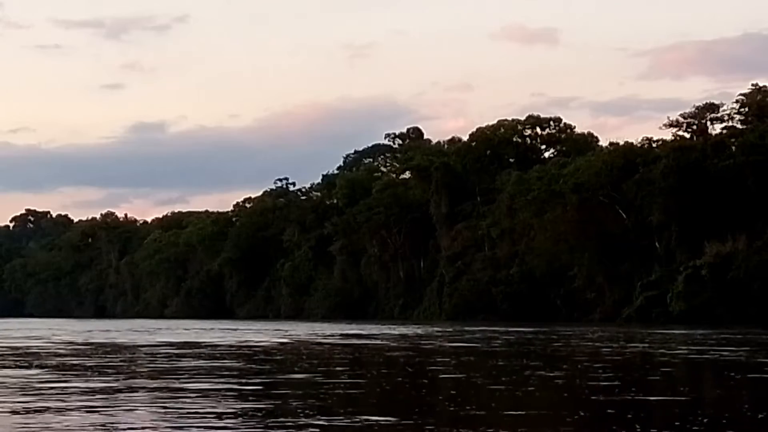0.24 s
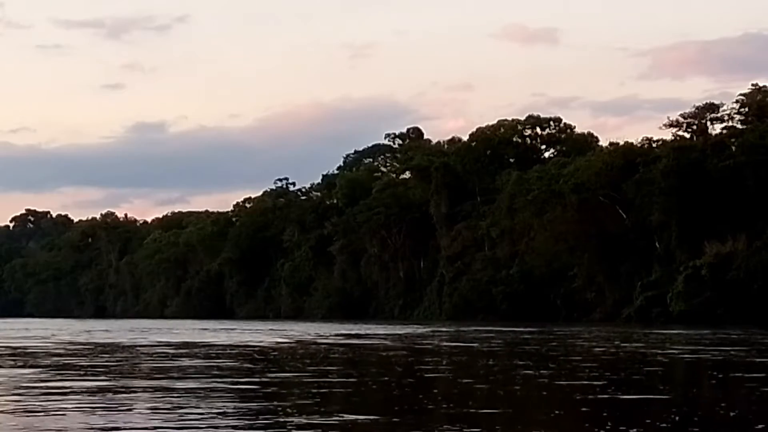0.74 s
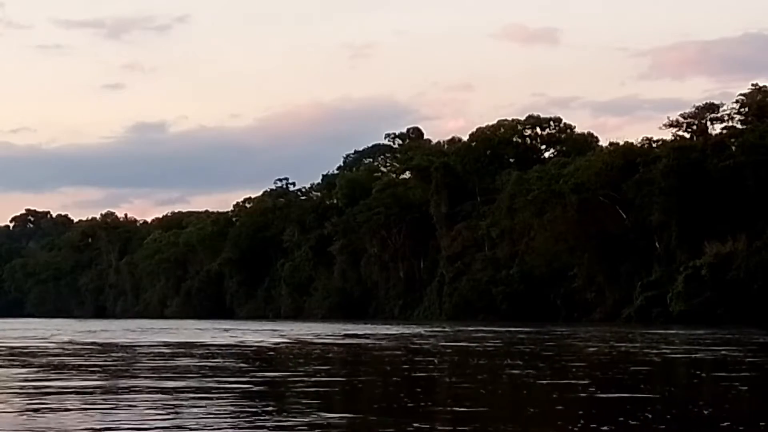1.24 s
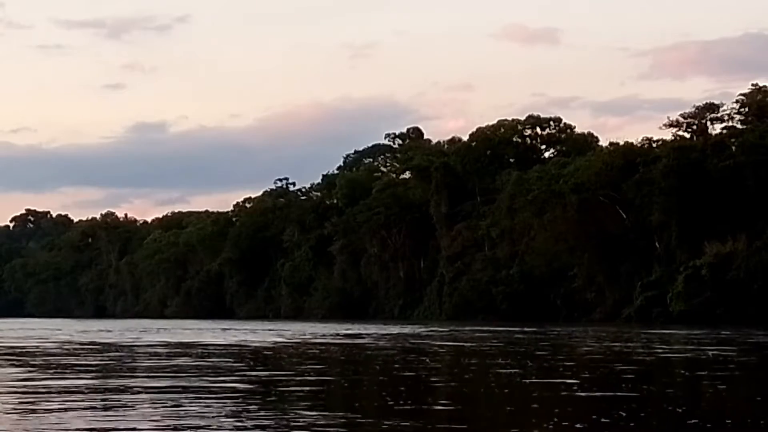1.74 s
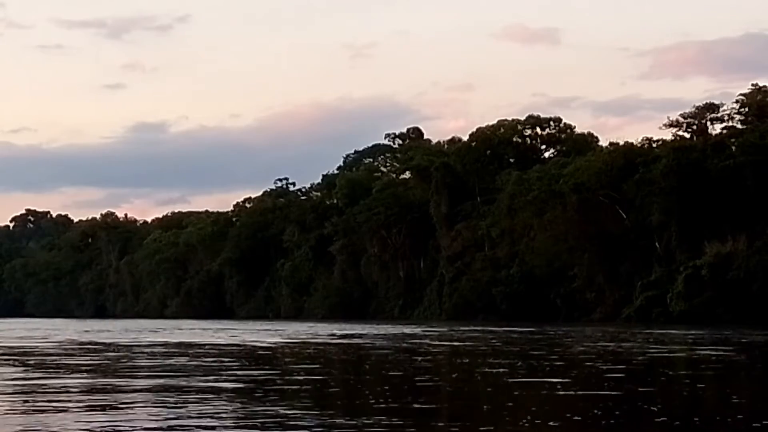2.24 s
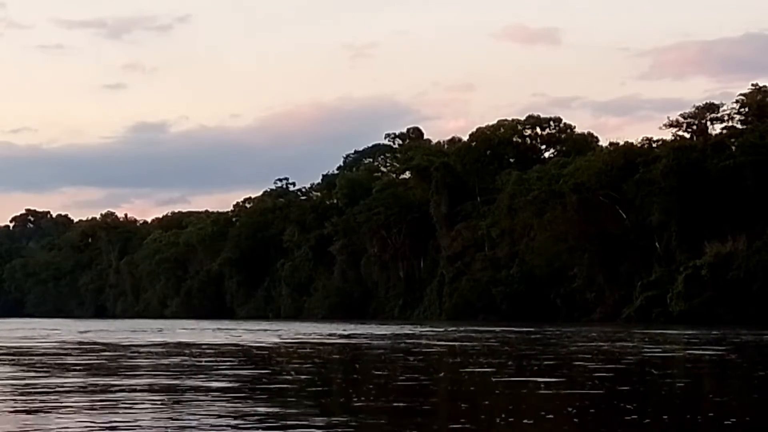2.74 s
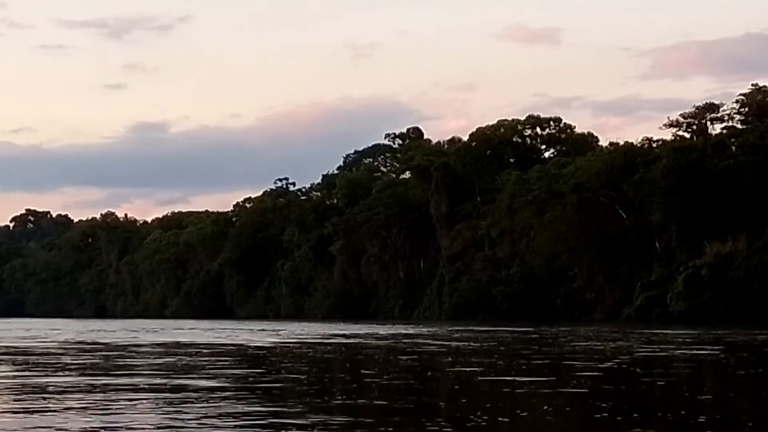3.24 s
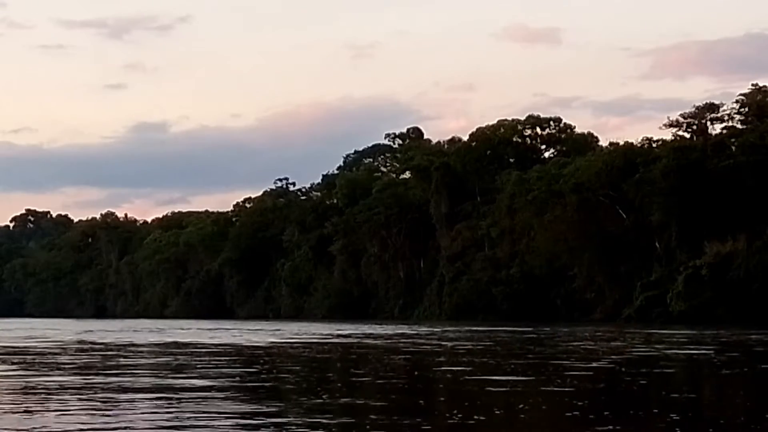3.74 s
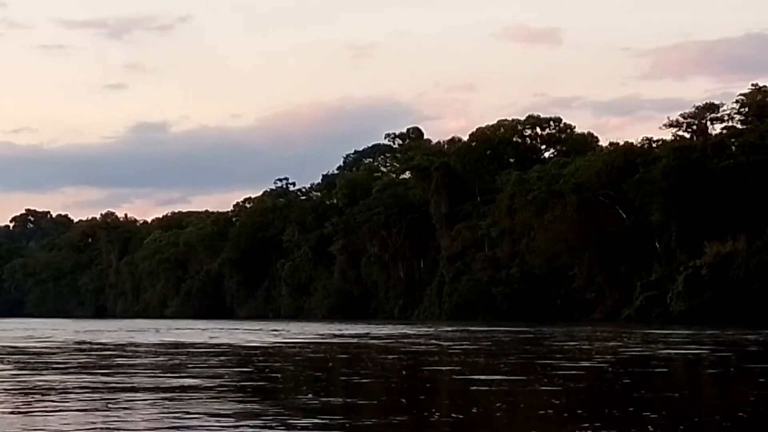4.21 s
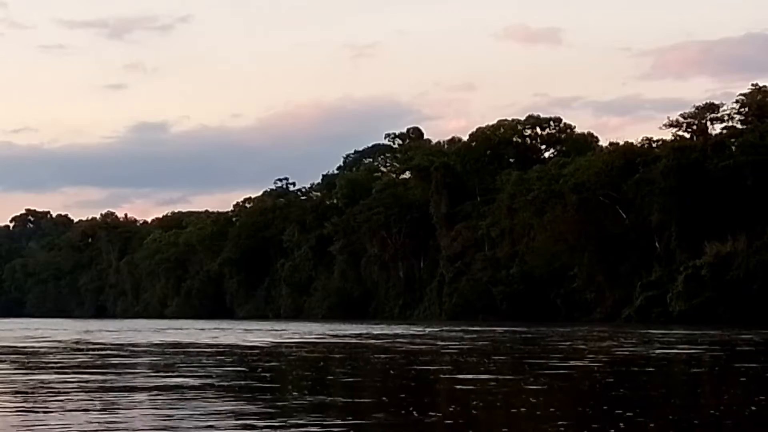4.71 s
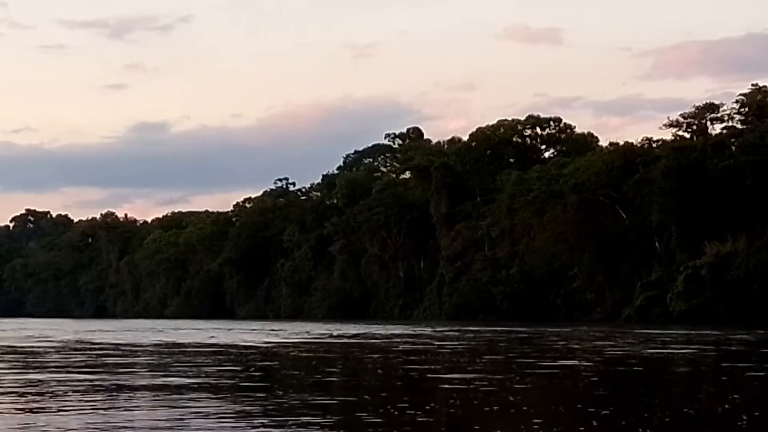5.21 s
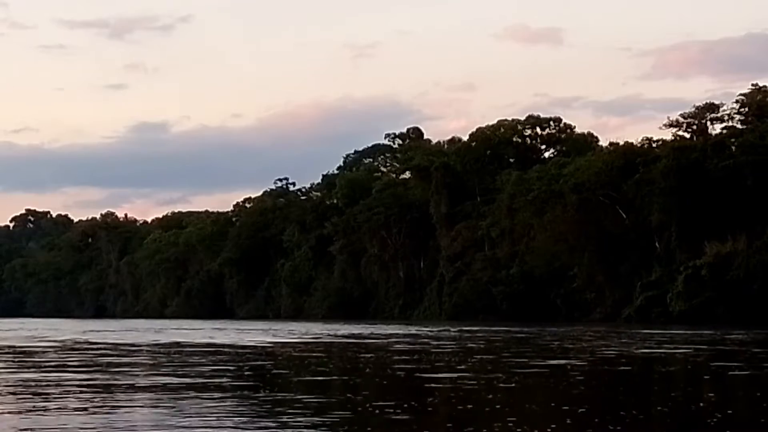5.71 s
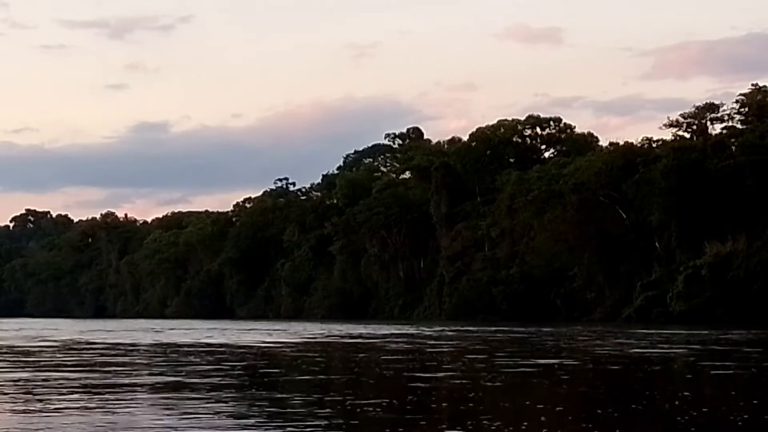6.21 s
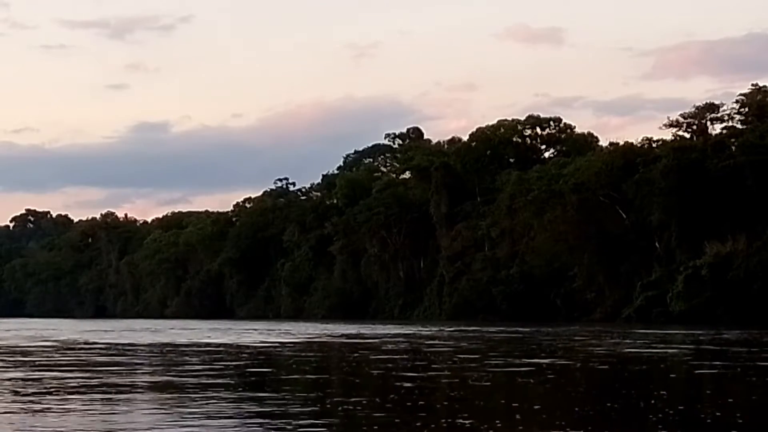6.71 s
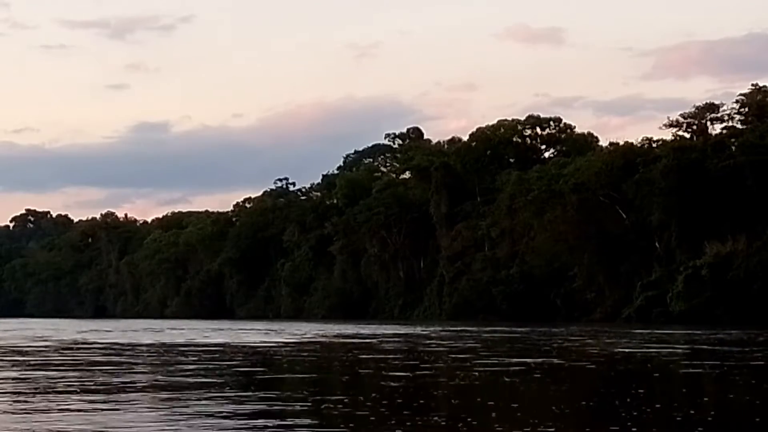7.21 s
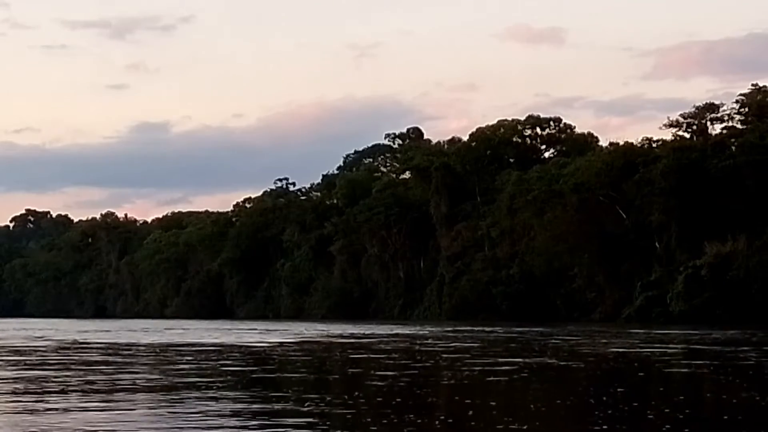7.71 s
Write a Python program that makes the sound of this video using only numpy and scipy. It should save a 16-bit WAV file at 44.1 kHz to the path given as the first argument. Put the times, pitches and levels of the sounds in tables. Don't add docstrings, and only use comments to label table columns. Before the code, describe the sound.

A dense, shrill cicada chorus pulses over a dusk river with cricket whistles, then one near cicada swells to a buzz and throbs rhythmically.

```python
import sys
import numpy as np
from scipy import signal
from scipy.fft import next_fast_len
from scipy.io import wavfile
from scipy.ndimage import uniform_filter1d

SR = 44100
rng = np.random.default_rng(int(sys.argv[2]) if len(sys.argv) > 2 else 0)


def volts_from_db(level):
    exponent = np.asarray(level, float) / 20
    return 10 ** exponent


def transcribe(signal):
    frames = np.atleast_2d(signal).T
    limited = np.clip(frames, -1, 1)
    pcm = np.round(limited * 32767).astype(np.int16)
    wavfile.write(sys.argv[1], SR, pcm)


N = 350595
TIME = np.arange(N) / SR
TAKEOVER_S = 4.52


def rms_one(x):
    return x / np.sqrt(np.mean(x ** 2) + 1e-20)


def in_time(rows):
    s, *columns = np.transpose(rows)
    return [np.interp(TIME, s, c) for c in columns]


def at_hz(points, hz):
    table_hz, value = np.transpose(points)
    return np.interp(np.log(hz), np.log(table_hz), value)


def drift(rate_hz):
    r = np.exp(-80 * np.pi * rate_hz / SR)
    white = rng.standard_normal(N // 40 + 2002)
    slow = signal.lfilter([1], [1, -2 * r, r * r], white)[2000:]
    return np.interp(np.arange(N) / 40, np.arange(len(slow)), rms_one(slow))


def resonate(x, hz, width_hz):
    r = np.exp(-np.pi * width_hz / SR)
    pole = [1, -2 * r * np.cos(2 * np.pi * hz / SR), r * r]
    once = signal.lfilter([1, 0, -1], pole, x)
    return rms_one(signal.lfilter([1], pole, once))


def steadied(x, share):
    power = uniform_filter1d(x ** 2, SR // 40)
    return rms_one(x / (power + 0.019) ** (share / 2))


def window(start_s, end_s, rise_s, fall_s, time=TIME):
    opening = 1 + np.tanh((time - start_s) / rise_s)
    closing = 1 + np.tanh((end_s - time) / fall_s)
    return 0.26 * opening * closing


def tymbal_clicks(per_s, spread_db):
    struck = rng.random(N) < per_s / SR
    return struck * volts_from_db(spread_db * rng.standard_normal(N)) * rng.choice([-1, 1], N)


# f/Hz, density/dB
FLOOR_SPECTRUM = [(20, -0.5), (60, 0), (160, -7), (350, -9), (600, -11.5), (1100, -17), (1400, -16),
                  (2000, -12), (2600, -31.5)]
FLOOR_DB = -77
# t/s, level/dB
WASH = [(0, -84), (2.5, -84), (5, -83), (6, -82), (7.95, -81)]


def river_and_hiss():
    edges_hz = 22 * 2 ** np.arange(0, 7.1, .5)
    white = rng.standard_normal((2, N + SR))
    wash_db, = in_time(WASH)
    out = 0
    for k, (low, high) in enumerate(zip(edges_hz, edges_hz[1:])):
        db = at_hz(FLOOR_SPECTRUM, np.sqrt(low * high)) + (high < 300) * (wash_db - wash_db.mean())
        band = signal.butter(2, [low, high], "band", fs=SR, output="sos")
        out = out + volts_from_db(db) * signal.sosfilt(band, white[k % 2])[SR:]
    hum = volts_from_db(-94.5) * resonate(white[0, :N], hz=350, width_hz=14.0)
    treble = signal.butter(4, 7200, "high", fs=SR, output="sos")
    top_hiss = volts_from_db(-63) * signal.sosfilt(treble, white[1, :N])
    return volts_from_db(FLOOR_DB) * rms_one(out) + hum + top_hiss


# t/s, f/Hz, level/dB
WHINE_CURVE = [(3.3, 1186, -93), (3.75, 1168, -97), (3.9, 1161, -94), (4.6, 1176, -92), (5.6, 1182, -91),
               (6.5, 1183, -95), (7.95, 1188, -93)]


def whine():
    hz, db = in_time(WHINE_CURVE)
    tone = np.sin(2 * np.pi * np.cumsum(hz) / SR)
    return volts_from_db(db + 3.0 + 2.5 * drift(2.5)) * window(3.3, 9, .03, .03) * tone


HOOTS = [
    (3.345, 783, -85, .07, 302),
    (3.754, 696, -83.5, 0.063, 102),
    (3.72, 742, -87.5, 0.077, -100),
    (5.79, 750, -85, .05, 1499),
    (5.928, 720, -88, .05, -900),
    (6.63, 687, -85, 0.064, 201),
    (6.9, 640, -86, .07, 699),
    (7.253, 1105, -90, .05, 299),
    (7.75, 704, -84.5, .07, -500),
]


def frogs():
    out = 0
    for s, hz, db, length_s, glide in HOOTS:
        age = TIME - s
        puff = np.exp(-(age / length_s) ** 2)
        out = out + volts_from_db(db) * puff * np.sin(2 * np.pi * (hz + glide * age / 2) * age)
    return out * (1 + 0.59 * drift(25))


CHIRPS = [(0.58, 0.95, 5210, -59), (1.3, 1.86, 5528, -56), (.43, .6, 5500, -56), (.8, 1.35, 5725, -59),
          (.28, .44, 5980, -54), (.71, .85, 5980, -53), (1.163, 1.29, 5975, -54),
          (1.543, 1.68, 5975, -54.5), (1.903, 2.04, 5975, -54), (2.3, 2.452, 5975, -54),
          (2.68, 2.82, 5985, -55), (4.42, 4.6, 5972, -54), (4.94, 5.08, 5975, -54), (6.98, 7.08, 5995, -55),
          (7.36, 7.52, 5980, -56)]


def crickets():
    noise, out = rng.standard_normal(N), np.zeros(N)
    for start_s, end_s, hz, db in CHIRPS:
        span = slice(int((start_s - .2) * SR), int((end_s + .2) * SR))
        whistle = steadied(resonate(noise[span], hz, width_hz=14.0), share=.75)
        out[span] += volts_from_db(db) * window(start_s, end_s, 0.044, 0.033, TIME[span]) * whistle
    return out


def singers(colours, low_hz, high_hz, count, patchy_db):
    pitches_hz = np.linspace(low_hz, high_hz, count)
    width_hz = 1.1 * (pitches_hz[1] - pitches_hz[0])
    crowd = [tymbal_clicks(per_s=9000, spread_db=0.5) for _ in range(2)]
    later = window(TAKEOVER_S, 20, 0.39, .1)
    out = 0
    for k, hz in enumerate(pitches_hz):
        db = (1 - later) * at_hz(colours[0], hz) + later * at_hz(colours[1], hz)
        db = db + patchy_db * (drift(3.8) + 0.59 * drift(12))
        out = out + (-1) ** (k // 2) * volts_from_db(db) * resonate(crowd[k % 2], hz, width_hz)
    return out / np.sqrt(uniform_filter1d(out ** 2, SR // 8))


def lulls(rows, fall, recover):
    s, db, length_s = np.transpose(rows)[:, :, None]
    moments = TIME[::64]
    age = moments - s
    side_s = length_s * np.where(age < 0, fall, recover)
    depth_db = np.sum(db * np.exp(-(age / side_s) ** 2), axis=0)
    return np.interp(TIME, moments, depth_db)


# f/Hz, density/dB
SHRILL_COLOURS = [
    [(2940, -38), (5000, -14), (5330, -5.5), (5820, -0.5), (6200, -0.5), (6630, -2.5), (6850, -11), (7030, -14.5), (7300, -22), (9490, -53), (16100, -120)],
    [(3060, -46.5), (5200, -18), (5390, -6), (5700, -6), (5860, 0), (6170, 0.5), (6820, -1.5), (7190, -11.5), (7300, -10.5), (9490, -45), (16100, -120)],
]
MIDDLE_COLOURS = [
    [(1710, -47), (2900, -18.5), (3580, -12.5), (3900, -9), (4210, -7.5), (4560, -6), (4890, -8.5), (5090, -5.5), (5300, 1), (6890, -30), (11700, -120)],
    [(1710, -46), (2900, -16), (3010, -14.5), (3080, -17.5), (3230, -8), (3470, -12), (3690, -4), (4000, -8.5), (4320, -4.5), (4580, -10), (4760, -5), (5130, -4), (5300, 1), (6890, -29), (11700, -120)],
]
LOW_COLOURS = [
    [(880, -48), (1500, -17.5), (1940, -14), (2420, 1.5), (2740, -2.5), (3100, -2), (4030, -30), (6820, -120)],
    [(880, -49), (1500, -17.5), (1870, -20), (2320, -4.5), (2630, -4.5), (2940, -7), (3100, -2), (4030, -30), (6820, -120)],
]
# t/s, level/dB
SONG_VIGOUR = [(0, -45.5), (.42, -45), (.8, -43.5), (1.2, -47.5), (1.65, -48.5), (2.0, -49), (2.4, -45),
               (2.75, -46.5), (3.2, -50), (3.6, -52.5), (4.2, -52.5), (4.6, -47), (5.5, -46.5), (6.6, -46),
               (7.95, -47)]
# t/s, depth/dB, length/s
SHARED_LULLS = [(0.222, 4.5, 0.087), (0.602, 8.5, 0.089), (0.962, 6, 0.12), (1.305, 1.5, .04),
                (1.47, 5, 0.046), (1.885, 2, .08), (2.222, 5.5, 0.088), (2.541, 10.5, 0.086),
                (2.918, 8.5, 0.067), (3.319, 5.5, .06), (4.36, 0, 0.077), (4.679, 2.5, 0.034),
                (4.893, 3, 0.042), (5.30, 2, 0.048), (5.688, 5, 0.044), (6.103, 3, 0.081),
                (6.494, 6, 0.075), (6.89, 6.5, .06), (7.303, 5.5, 0.048), (7.701, 8, 0.043)]
# t/s, depth/dB, length/s
LOW_LATE_LULLS = [(4.884, 5.5, 0.087), (5.286, 3, 0.098), (5.694, 4, 0.089), (6.051, 4, 0.099),
                  (6.403, 4.5, 0.098), (6.863, 5, 0.099), (7.285, 4.5, .07), (7.635, 6.5, 0.11)]
# level/dB, vigour share/1, early lull share/1, late lull share/1, fall factor/1, recovery factor/1
CROWD_MIX = [
    (-44.5, 1.01, 1.2, 0.97, 1.07, 1.15),
    (-53.5, .3, 0.32, 0.93, 1, 1.2),
    (-68.5, 0.23, 0.38, 0.92, 1.01, 0.93),
]
TAKEOVER_CHANGE_DB = [0.04, -1.5, -.6]


def chorus():
    vigour_db = uniform_filter1d(in_time(SONG_VIGOUR)[0], SR // 25) + 47
    voices = [singers(SHRILL_COLOURS, 5170, 7226, count=20, patchy_db=3.0),
              singers(MIDDLE_COLOURS, 3050, 5097, count=14, patchy_db=1.53),
              singers(LOW_COLOURS, 1599, 2950, count=8, patchy_db=1.3)]
    early, late = SHARED_LULLS[:10], SHARED_LULLS[10:]
    # t/s, depth/dB, length/s
    hush = [(row[0] - .125, 1.5, 0.023) for row in NEAR_THROBS]
    own_lulls = [late + hush, late, LOW_LATE_LULLS]
    later = window(TAKEOVER_S, 20, .3, .1)
    out = 0
    for voice, own, change_db, mix in zip(voices, own_lulls, TAKEOVER_CHANGE_DB, CROWD_MIX):
        db, follow, first, second, fall, recover = mix
        quiet_db = first * lulls(early, fall, recover) + second * lulls(own, fall, recover)
        out = out + volts_from_db(db + change_db * later + follow * vigour_db - quiet_db) * voice
    return out


def sag(x):
    shift_hz, reach_s = 119.7, .075
    away_s = np.min([np.abs(TIME - row[0]) for row in NEAR_THROBS], axis=0)
    hz = shift_hz * (np.minimum(away_s / reach_s, 1) ** 2 - .3)
    hz = hz * (TIME > 4.5)
    analytic = signal.hilbert(x, next_fast_len(N))[:N]
    return np.real(analytic * np.exp(2j * np.pi * np.cumsum(hz) / SR))


def forest(x, t60_s, wet_db):
    age = np.arange(SR // 2) / SR
    tail = rng.standard_normal(len(age)) * volts_from_db(-60 * age / t60_s)
    tail *= volts_from_db(wet_db) / np.sqrt(np.sum(tail ** 2))
    return x + signal.fftconvolve(x, tail)[:N]


TYMBAL_HZ = 193.4
SWELL_TOP_S, SWELL_TOP_DB, SWELL_DB_PER_S, SWELL_BEND = 4.23, -46.5, 11.5, 1.16
# centre t/s, effort/dB, length factor/1, extra low-mode level/dB
NEAR_THROBS = [
    (4.809, -45.5, 1.14, 1),
    (5.211, -45.5, 1.14, 3.5),
    (5.602, -46, 1.18, 0.5),
    (5.985, -46, 1.18, -1),
    (6.374, -45, 1.14, 2),
    (6.777, -45.5, 1.2, 0.5),
    (7.195, -45.5, 1.08, 1.1),
    (7.619, -46.5, 0.98, 1.5),
    (8.025, -52, 1.5, -10),
]
# f/Hz, width/Hz, swell level/dB, throb level/dB, effort slope/1, lead before throb centre/s
BODY_MODES = [(3540, 370, -12, -27, 1.6, 0.027), (3905, 93, -27, -12, 1.3, 0.029),
              (4298, 110, -4, -4, 1.1, .03), (4433, 170, 0, -0.5, 1.1, 0.044),
              (4814, 130, 1.5, -3, 1.8, .062), (5175, 220, -1, -1, 1.4, .07),
              (5550, 85, -5, -7.5, 1.2, .082), (5750, 110, -4, -4, 0.81, .076),
              (5875, 130, -1.5, -3.5, 1.1, 0.063), (6080, 170, -6, -9.5, 1.1, .08),
              (6282, 130, -0.5, 2, .8, 0.081), (6363, 150, 0, -0.5, 0.78, 0.074),
              (6510, 210, -4.5, -3.5, 0.9, 0.11), (6930, 300, -5.5, -7.5, 1.1, 0.16)]


def near_cicada():
    stroke = 2 * np.pi * np.cumsum(TYMBAL_HZ * (1 + 0.01007 * drift(3))) / SR
    first_tymbal = np.exp(1.6 * (np.cos(stroke) - 1))
    second_tymbal = 0.71 * np.exp(2.2 * (-np.cos(stroke) - 1))
    clicks = (first_tymbal + second_tymbal) * tymbal_clicks(per_s=6000, spread_db=-0.5)
    moments = TIME[::32]
    to_top_s = np.maximum(SWELL_TOP_S - moments, 0)
    effort_db = SWELL_TOP_DB - SWELL_DB_PER_S * to_top_s ** SWELL_BEND
    top_db = effort_db.max()
    out = np.zeros(N)
    for k, (hz, width_hz, swell_db, throb_db, steep, lead_s) in enumerate(BODY_MODES):
        lag_s = 0.017 + 0.53 * lead_s
        lowness = np.clip((6000 - hz) / 1600, 0, 1)
        gain = volts_from_db(top_db + swell_db + steep * (effort_db - top_db))
        gain = gain * window(2.2, 4.19 + lag_s, 0.17, 0.0099, moments)
        for s, db, stretch, low_db in NEAR_THROBS:
            start_s, end_s = s - lead_s * stretch, s + lag_s * stretch
            gate = window(start_s, end_s, 0.0044, 0.013 + 0.018 * lowness, moments)
            gain += volts_from_db(db - 2.5 + throb_db + lowness * low_db) * gate
        ringing = steadied(resonate(clicks, hz, width_hz), share=0.39)
        out += (-1) ** k * np.interp(TIME, moments, gain) * ringing
    return forest(sag(out) * volts_from_db(-2), t60_s=.5, wet_db=-4.5)


def scene():
    mono = river_and_hiss() + whine() + frogs() + crickets() + chorus() + near_cicada()
    return np.array([mono, mono])


def band_limit(x):
    return signal.sosfilt(signal.butter(12, 15750, fs=SR, output="sos"), x)


def record(dry):
    dull = signal.sosfilt(signal.butter(8, 7150, fs=SR, output="sos"), dry)
    dull = signal.sosfilt(signal.ellip(12, .5, 60, 7570, fs=SR, output="sos"), dull)
    above = signal.butter(3, 11000, "high", fs=SR, output="sos")
    air = volts_from_db(-101) * signal.sosfilt(above, rng.standard_normal(N))
    offset = .0015
    return band_limit(dull + air + offset)


dry = scene()
out = record(dry)
transcribe(out)
```